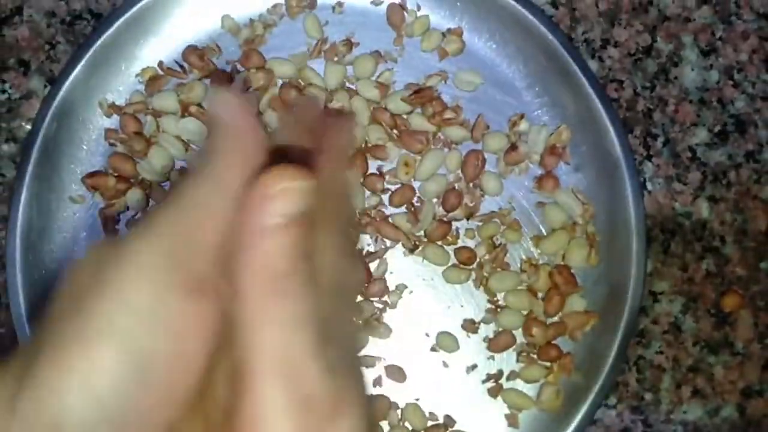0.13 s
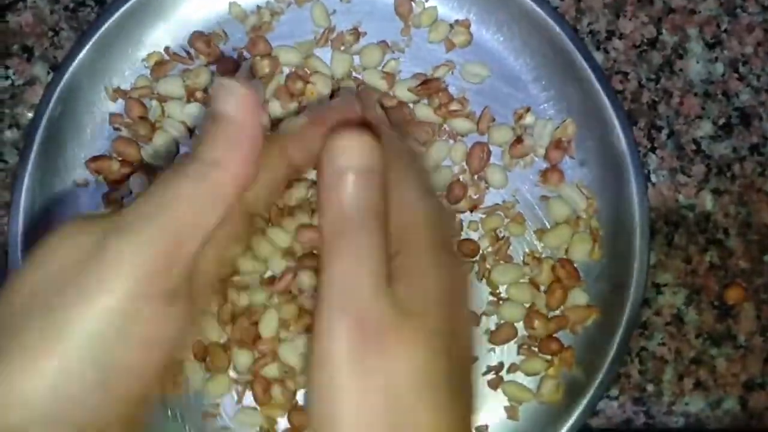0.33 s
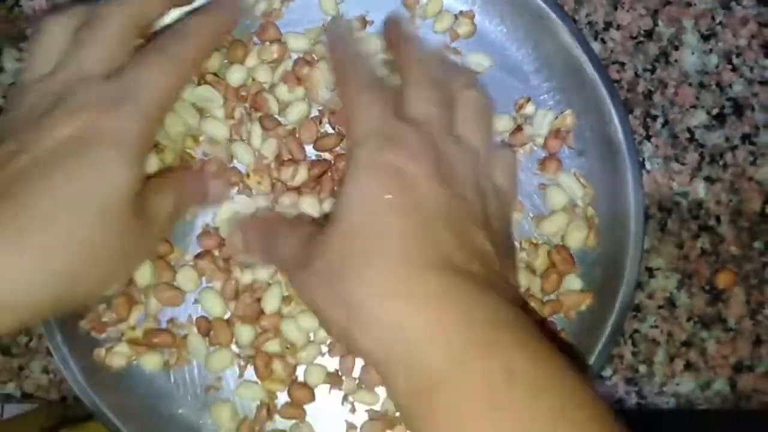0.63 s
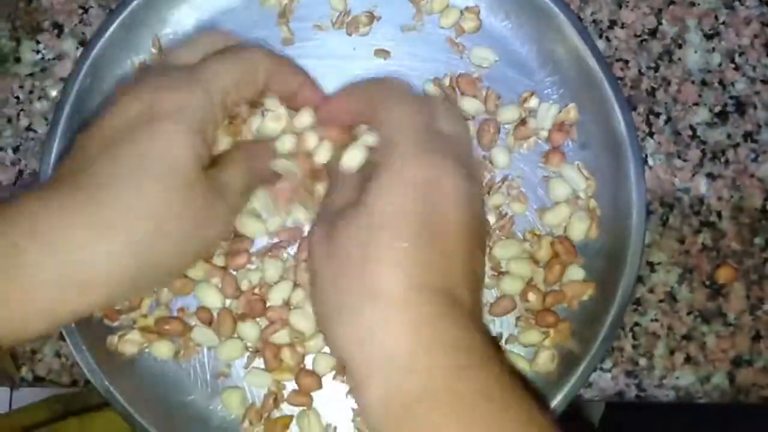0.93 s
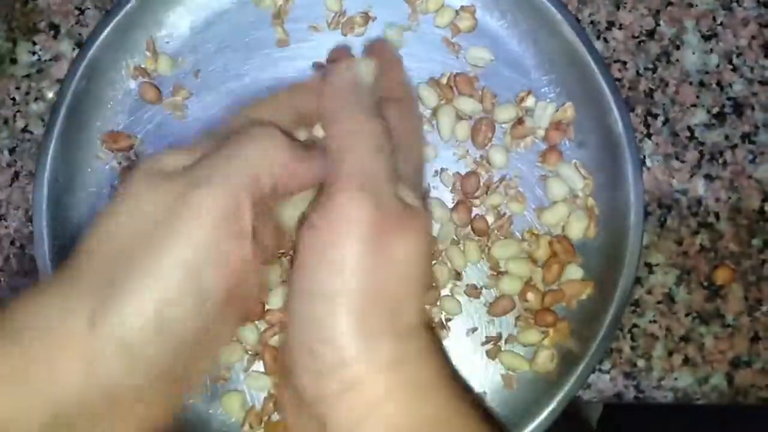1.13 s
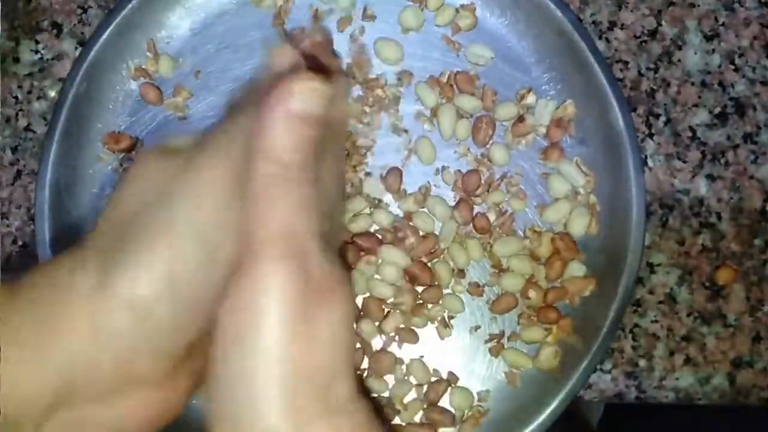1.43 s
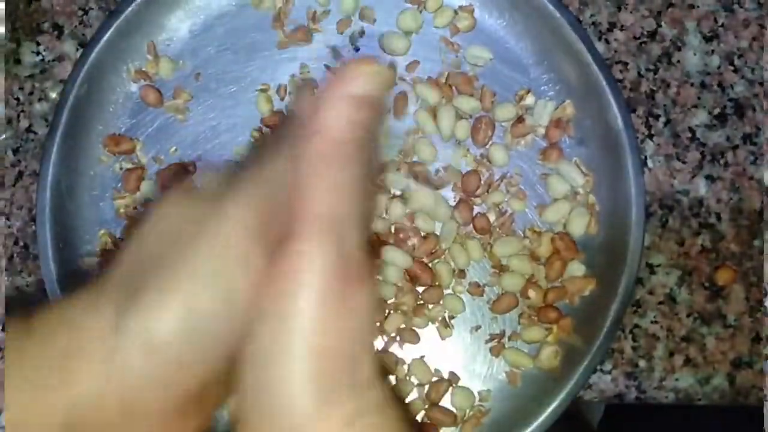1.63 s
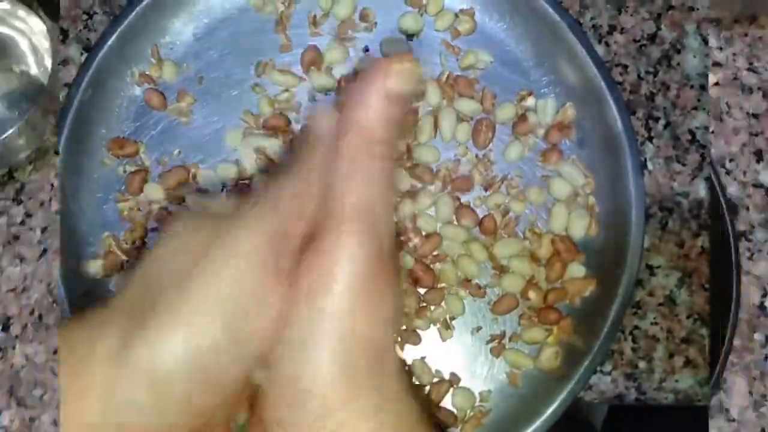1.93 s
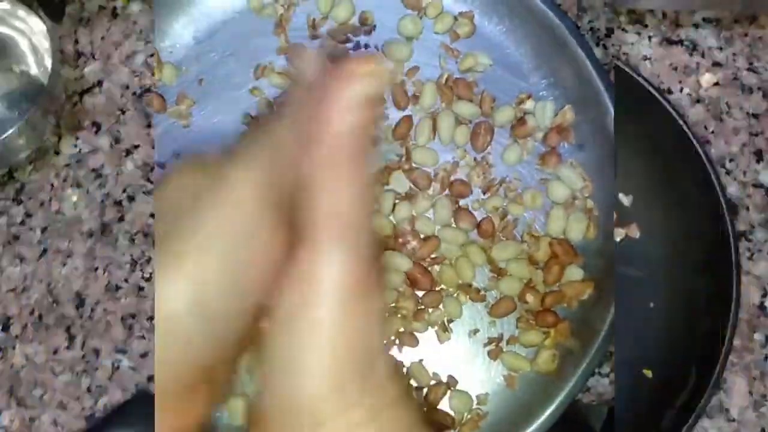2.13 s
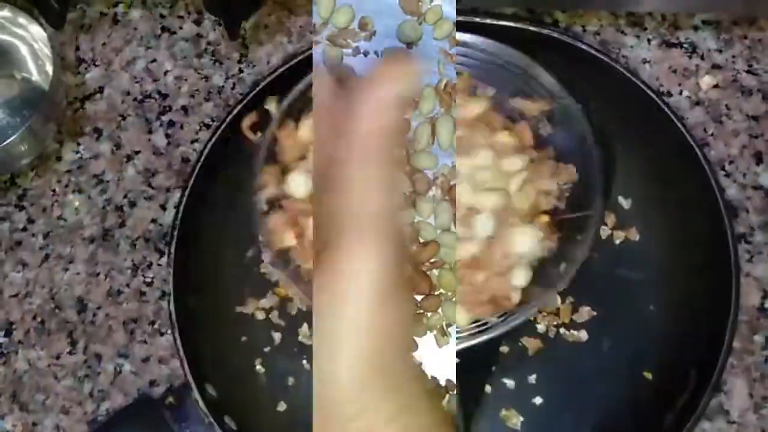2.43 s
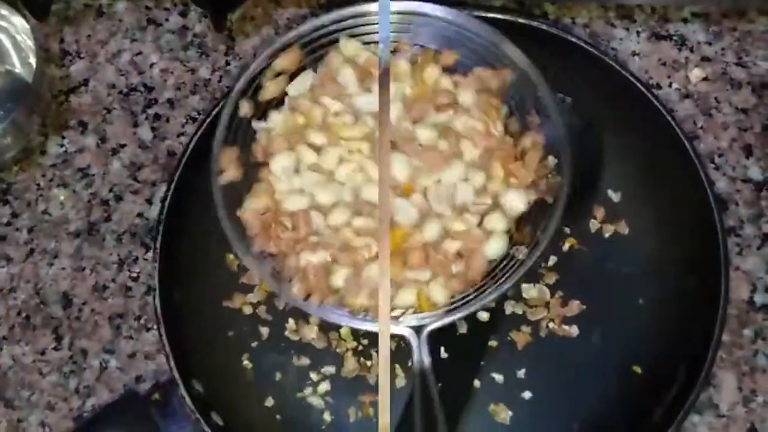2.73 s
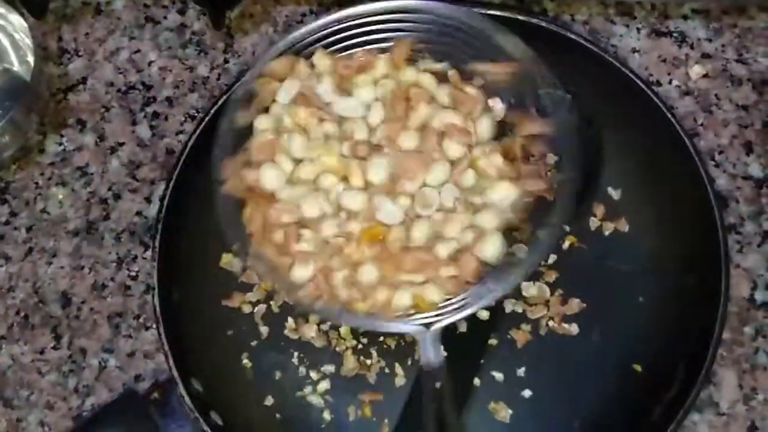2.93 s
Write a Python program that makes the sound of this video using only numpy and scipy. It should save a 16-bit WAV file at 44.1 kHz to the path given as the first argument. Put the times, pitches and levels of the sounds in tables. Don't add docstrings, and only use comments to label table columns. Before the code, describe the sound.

Roasted peanuts are rubbed between palms over a steel plate, close up in a quiet kitchen. Papery skins rustle at first; a muted scooping clatter peaks around 0.35-0.5 s. Dense small ticks and rolling follow from 0.7 to 1.15 s. From 1.2 s dropped nuts ping shortly on metal, loudest at 1.4-1.6 s, thinning after 2 s. Near 2.4 s a low air puff and soft steady hiss enter, with a few faint ticks.

```python
import sys
import numpy as np
from scipy import signal
from scipy.fft import rfft, irfft
from scipy.io import wavfile
from scipy.ndimage import uniform_filter1d

SR = 44100
rng = np.random.default_rng(int(sys.argv[2]) if len(sys.argv) > 2 else 0)


def voltage_ratio(decibels):
    exponent = np.asarray(decibels, float) / 20
    return 10 ** exponent


def to_wav(s):
    ch = np.atleast_2d(s).T
    pcm = np.round(np.clip(ch, -1, 1) * 32767)
    wavfile.write(sys.argv[1], SR, pcm.astype(np.int16))


N = 134505

# pitch_hz, level_db
ROOM_TONE = [(15, 3), (60, -9.5), (97, 1), (125, -9.5), (155, -5.5), (200, -14.5), (900, -14.5),
             (1700, -18)]
# pitch_hz, level_db
MIC_HISS = [(9000, -22), (12800, -14), (15300, 0)]
# time_s, rolling_db, rustle_db
HANDS = [(0, -48.5, -45), (.075, -40, -40), (.12, -38, -37.5), (.14, -38, -51), (.19, -39.5, -40),
         (.31, -45, -53), (.42, -21, -41), (.53, -44, -55), (.66, -46.5, -64), (.715, -42, -44.5),
         (.735, -34.5, -43.5), (.88, -29.5, -39.5), (1.2, -36, -41.5), (1.7, -35, -42.5), (1.9, -32, -41.5),
         (2.03, -45.5, -48), (2.115, -49, -40.5), (2.3, -45, -52.5), (2.57, -47, -39), (3.05, -45, -73)]
# pitch_hz, level_db
ROLL_COLOUR = [(500, -12.5), (1140, -11), (1740, 1), (2500, -2), (3600, -8), (5300, -9.5), (6730, -5.5),
               (9000, -47)]
# pitch_hz, level_db
SKIN_COLOUR = [(3000, -6.5), (5180, -5), (6810, 0.5), (9140, -13.5), (12000, -6.5), (12700, -10.5),
               (15300, 3), (16000, 0.5)]
# start_s, length_s, level_db
SWISHES = [
    (0.047, 0.14, -39.5),
    (2.39, 0.089, -41.5),
]
# pitch_hz, level_db
SWISH_COLOUR = [(1100, 0), (1700, 6), (2200, -12), (3000, -24), (4500, -13), (6000, -40), (16000, -70)]
# start_s, level_db, pitch_hz
TICKS = [(0.0719,-19.5,1680), (0.561,-23,1800), (.622,-24,2370), (.645,-33,1110), (0.6725,-32,2500),
         (0.733,-22,3700), (0.7407,-17,2200), (0.7446,-18,1980), (0.7772,-21,2490), (.7990,-16,2900),
         (.8090,-12,2800), (.8724,-13,3270), (0.883,-27,1900), (.8964,-16,2900), (0.9072,-18.5,2500),
         (.9204,-19,2300), (.9344,-18,3300), (0.9492,-19,2400), (.9530,-13,2880), (.9598,-17,4200),
         (.9924,-25,3900), (0.9985,-19,2980), (1.0404,-17,2400), (1.0494,-17,1710), (1.0824,-19.5,2600),
         (1.0984,-18,2040), (1.1224,-19,2000), (1.1354,-18,2400), (1.1554,-29,2500), (1.4324,-6,3350),
         (1.447,-8,3860), (1.456,-15,2220), (1.5630,-18,1990), (1.5707,-16,2500), (1.6064,-18.5,1980),
         (1.7694,-16,2930), (1.786,-13,2490), (1.794,-28,4400), (2.0906,-23,4020), (2.2334,-18,2580),
         (2.2474,-18,4000), (2.2554,-16.5,3280), (2.362,-23,2600), (2.5834,-17.5,2630), (2.6294,-18.5,2600),
         (2.7634,-19.5,1700), (2.9844,-19.5,2680), (3.0134,-22,3550)]
# start_s, level_db, pitch_hz, treble_db
SCOOPED = [(0.2191, -5.5, 3410, -16.5), (0.3341, -23.5, 2250, -46), (0.3436, -20, 2880, -29),
           (0.3673, -9.5, 2470, -17), (0.407, -13, 2520, -48), (0.4225, -15.5, 1750, -30),
           (0.4366, -4, 1700, -36), (0.4465, -5.5, 2670, -32), (0.4677, -5, 2810, -21),
           (0.4964, -14.5, 1740, -72), (0.5305, -14, 1837, -92), (0.7245, -16, 2360, -23),
           (0.7655, -19, 2470, -57), (0.8255, -14.5, 2280, -15), (0.85, -16, 2300, -14),
           (0.864, -9.5, 2140, -31), (0.8923, -17, 1760, -23), (0.957, -16, 2240, -18),
           (0.9832, -15.5, 1800, -24), (1.0196, -16.5, 1990, -50), (1.0285, -15.5, 1760, -66),
           (1.0781, -17.5, 1930, -63), (1.1804, -21.5, 1610, -45)]
# start_s, level_db, pitch_hz, treble_db
DROPPED = [(1.2236, -21, 1422, 2), (1.2439, -9.5, 2880, -36), (1.295, -15.5, 2790, -51),
           (1.3476, -10.5, 1400, -43), (1.4234, -0.7, 2360, -16.5), (1.5116, -5, 1480, -23),
           (1.5437, -4, 1436, -18), (1.5593, -4, 3480, -27), (1.6003, -7, 2900, -16),
           (1.6114, -10.5, 3370, -29), (1.6448, -22, 2410, -32), (1.7618, -7.5, 1493, -18.5),
           (1.7774, -9.5, 3440, -1.5), (1.8235, -15, 2310, -33), (1.8457, -19.5, 3240, -10),
           (1.9393, -11.5, 1457, -18.5), (1.9516, -19, 3550, -24), (1.9886, -22, 1990, -35),
           (2.1197, -16.5, 2440, -35), (2.143, -13, 3330, -10), (2.1524, -18.5, 3330, -50),
           (2.2388, -17, 2450, -5), (2.2922, -23.5, 2410, -9), (2.492, -16.5, 3380, -30),
           (2.6614, -26, 2230, 14), (2.7537, -18.5, 3160, -20), (2.9659, -23.5, 2760, -60)]
# pitch_hz, level_db, t60_s
PLATE_MODES = [(1443, -2, .13), (1710, -8, .14), (1805, -8, .12), (1903, -7, .12), (2345, -4, .11),
               (2595, -8, .16), (2830, -5, .12), (2975, -5, .14), (3327, -1, .19), (3420, -2, .13),
               (3865, -2, .13), (4460, -8, .13), (5206, -10, .14), (6545, -8, .12)]
# pitch_hz, level_db
KNOCK_COLOUR = [(300, -27.5), (1150, -18), (1500, -6), (2320, -2), (3900, -5.5), (5300, -10.5),
                (6900, -7.5), (9000, -32), (16000, -34.5)]
# pitch_hz, t60_s
FINE_RING = [(600, 0.28), (1400, 0.25), (3500, 0.15), (7000, 0.23), (14000, 0.3)]
# start_s, level_db, pitch_hz
SNAPS = [
    (.632, -43, 9300),
    (1.421, -25.5, 14000),
    (2.108, -35, 13400),
]
# pitch_hz, level_db
HISS_COLOUR = [(15, 7), (40, -34), (119, -17.5), (1190, -11), (4700, -28), (6480, -24), (8930, -37),
               (16000, -19.5)]
# time_s, level_db
HISS_FADER = [(2.3, -42), (2.42, -42), (2.6, -38), (2.9, -37.5), (3.05, -36)]
# pitch_hz, level_db, width_hz
HUMS = [
    (90, -46.5, 5.9),
    (1166, -47.5, 14),
    (27, -51.5, 4.5),
]

ONSET_DELAY_S = .001


def evened(x):
    return x / np.sqrt(np.mean(x ** 2) + 1e-20)


def read(points, hz):
    f, value = np.transpose(points)
    return np.interp(np.log(hz + 1), np.log(f + 1), value)


def along(rows, column=1):
    rows = np.asarray(rows)
    return np.interp(np.arange(N) / SR, rows[:, 0], rows[:, column])


def add(mix, s, sound):
    part = mix[round(s * SR):][:len(sound)]
    part += sound[:len(part)]


def causal(db):
    log = np.log(voltage_ratio(np.maximum(db, -100)))
    full = np.r_[log, log[-2:0:-1]]
    return np.fft.ifft(np.exp(full - 1j * signal.hilbert(full).imag)).real[:1024]


def colour(x, table, slope_db=-30):
    hz = np.fft.rfftfreq(N, 1 / SR)
    octaves_below = np.maximum(np.log2(table[0][0] / (hz + 1)), 0)
    return evened(irfft(rfft(x) * voltage_ratio(read(table, hz) + slope_db * octaves_below), N))


def noise(table, patchy_db, slope_db=-30):
    frames = N // 128 + 6
    a, b, patches = rng.standard_normal((frames, 257, 3)).T
    patches = uniform_filter1d(patches, size=8, axis=0)
    patches = evened(uniform_filter1d(patches, size=20, axis=1))
    x = signal.istft((a + 1j * b) * voltage_ratio(patchy_db * patches), nperseg=512, noverlap=384)[1][:N]
    return colour(x, table, slope_db)


def grain_sizes(per_s, spread_db):
    size = voltage_ratio(spread_db * np.minimum(rng.exponential(1, N), 4))
    return size * (rng.random(N) < per_s / SR)


def room_tone():
    sink_s = np.maximum(np.arange(N) / SR - 1.22, 0)
    quiet = signal.lfilter([.3], [1, -.7], noise(ROOM_TONE, patchy_db=0.0))
    mic = voltage_ratio(-49) * noise(MIC_HISS, patchy_db=-3.0, slope_db=-14)
    return voltage_ratio(-41.5 - 5.5 * sink_s) * quiet + mic


def rolling():
    t, out = np.arange(3000) / SR, np.zeros(N)
    size = grain_sizes(per_s=900, spread_db=3.2)
    kind = rng.integers(0, 16, N)
    for k in range(16):
        tick = .5 * rng.standard_normal(len(t)) * voltage_ratio(-60 * t / .035)
        for hz, db, t60 in PLATE_MODES:
            level_db = db - 15 + 6 * rng.standard_normal()
            pitch_hz = hz * rng.uniform(.93, 1.07)
            tick = tick + voltage_ratio(level_db - 60 * t / (.5 * t60)) * np.sin(2 * np.pi * pitch_hz * t)
        out += signal.oaconvolve(size * (kind == k), tick)[:N]
    return voltage_ratio(along(HANDS, column=1) - 3.5) * colour(out, ROLL_COLOUR)


def rustle():
    size = grain_sizes(per_s=2500, spread_db=6.4)
    grains = colour(size * rng.standard_normal(N), SKIN_COLOUR, slope_db=-6)
    mix = 0.35 * grains + noise(SKIN_COLOUR, patchy_db=1.5, slope_db=-18)
    flutter = evened(uniform_filter1d(rng.standard_normal(N), size=900))
    mix = mix * voltage_ratio(1.73 * flutter)
    return voltage_ratio(along(HANDS, column=2) + 5.0) * evened(mix)


def swish():
    t, strokes = np.arange(N) / SR, np.zeros(N)
    for s, length, db in SWISHES:
        strokes += voltage_ratio(db) * np.sin(np.pi * np.clip((t - s) / length, 0, 1))
    return strokes * noise(SWISH_COLOUR, patchy_db=2)


def ticks():
    t, out = np.arange(3000) / SR, np.zeros(N)
    cycles, tail_db, tail_t60 = 5, -14, .06
    for s, db, hz in TICKS:
        band = signal.butter(1, [.65 * hz, 1.5 * hz], "band", fs=SR)
        tail = evened(signal.lfilter(*band, rng.standard_normal(len(t))))
        tail = tail * voltage_ratio(tail_db - 60 * t / tail_t60)
        click = np.sin(2 * np.pi * hz * t) * voltage_ratio(-60 * t * hz / (2 * cycles))
        add(out, s + ONSET_DELAY_S, voltage_ratio(db - 3) * (0.92 * click + tail))
    return out


def plate_rings(nuts, first_drop_s, tone, t):
    main = np.array(PLATE_MODES)
    fine = np.geomspace(450, 15800, num=420) * rng.uniform(.99, 1.01, size=420)
    fine_t60 = read(FINE_RING, fine) * rng.uniform(0.26, 1.14, size=420)
    f, t60 = np.r_[main[:, 0], fine], np.r_[main[:, 2], fine_t60]
    fine_db = -20.5 + read(KNOCK_COLOUR, fine) + 10 * np.log10(fine / 3000)
    base_db = np.r_[-6.5 + main[:, 1], fine_db]
    is_main = np.arange(len(f)) < len(main)
    shape = (len(nuts), len(f))
    landing_db = np.where(is_main, 3, 6.5) * rng.standard_normal(shape)
    phase = rng.uniform(0, 2 * np.pi, shape)
    held_db = -8 * np.outer(nuts[:, 0] < first_drop_s, is_main)
    weight = voltage_ratio(held_db + base_db + tone(f) + landing_db) * np.exp(1j * phase)
    modes = np.exp(t * (2j * np.pi * f - np.log(1000) / t60)[:, None])
    return (weight @ modes).real


def knocks():
    hz, t, out = np.fft.rfftfreq(4096, 1 / SR), np.arange(8000) / SR, np.zeros(N)
    nuts = np.array(SCOOPED + DROPPED)
    first_drop_s = DROPPED[0][0]

    def tone(v):
        focus = 5 * np.exp(-(np.log2((v + 1) / nuts[:, 2:3]) / 0.25) ** 2)
        treble = (nuts[:, 3:] + 17) / (1 + (4800 / (v + 1)) ** 6) / (1 + (v / 11000) ** 6)
        return focus + treble

    rings = plate_rings(nuts, first_drop_s, tone, t)
    cracks_db = read(KNOCK_COLOUR, hz) + .5 * tone(hz)
    for (s, db, own_hz), ring, crack_db in zip(nuts[:, :3], rings, cracks_db):
        dropped = s > first_drop_s
        ring = voltage_ratio(-12.5) * ring / np.sqrt(np.mean(ring[:400] ** 2)) * np.minimum(t / 0.00097, 1)
        body = voltage_ratio(-13.5 - 60 * t / (0.055 if dropped else 0.074)) * np.sin(2 * np.pi * own_hz * t)
        ring = ring + 1800 / own_hz * body * np.minimum(t / 0.00048, 1)
        ring = ring * voltage_ratio(7 * db * t)
        crack = causal(crack_db)
        weight = min(own_hz / 2300, 1) if dropped else 1.05
        crack = weight * voltage_ratio(-1) * crack / abs(crack).max()
        add(ring, 0, crack)
        add(ring, .0024, -voltage_ratio(-5) * crack)
        add(out, s + ONSET_DELAY_S, voltage_ratio(db) * ring)
    return out


def room(x):
    t = np.arange(SR // 2) / SR
    tail = uniform_filter1d(rng.standard_normal(len(t)), size=4) * voltage_ratio(-60 * t / 0.23) * (t > .006)
    return signal.fftconvolve(x, tail / np.linalg.norm(tail))[:N]


def snaps():
    t, out = np.arange(3000) / SR, np.zeros(N)
    for s, db, hz in SNAPS:
        band = signal.butter(2, [.9 * hz, min(1.1 * hz, 16000)], "band", fs=SR)
        spit = evened(signal.lfilter(*band, rng.standard_normal(len(t))))
        add(out, s, voltage_ratio(db - 60 * t / 0.13) * spit)
    return out


def kitchen_hiss():
    t, level = np.arange(N) / SR, along(HISS_FADER)
    hiss = voltage_ratio(3.5 + level) * noise(HISS_COLOUR, patchy_db=1.2)
    for hz, db, width in HUMS:
        r = np.exp(-np.pi * width / SR)
        grit = rng.standard_normal(N) + 1j * rng.standard_normal(N)
        wobble = signal.lfilter([1 - r], [1, -r], grit)
        hum = evened((wobble * np.exp(2j * np.pi * hz * t)).real)
        hiss = hiss + voltage_ratio(db + level - level[-1]) * hum
    return hiss * np.clip((t - 2.25) / 0.27, 0, 1)


def puff():
    start_s, rise_s, fall_s, back_s = 2.388, .03, .137, 0.6
    u = np.maximum(np.arange(N) / SR - start_s, 0)
    push = np.exp(-(u / fall_s) ** 2) - .15 * np.exp(-u / back_s)
    return voltage_ratio(-19.3) * (1 - np.exp(-u / rise_s)) * push


def scene():
    nuts = knocks() + rolling()
    nuts = nuts + voltage_ratio(-14.5) * room(nuts)
    skins = rustle()
    air = kitchen_hiss() + room_tone() + puff()
    details = snaps() + ticks() + swish()
    return (nuts + skins + air + details)[None]


def band_limit(x):
    return signal.sosfilt(signal.butter(12, 17120, fs=SR, output="sos"), x)


def record(dry):
    lowpass = signal.firwin(401, 15850, window=("kaiser", 9), fs=SR)
    cut = signal.oaconvolve(dry, lowpass[None], "same")
    return band_limit(np.clip(cut, -.985, .985))


dry = scene()
out = record(dry)
to_wav(out)
```